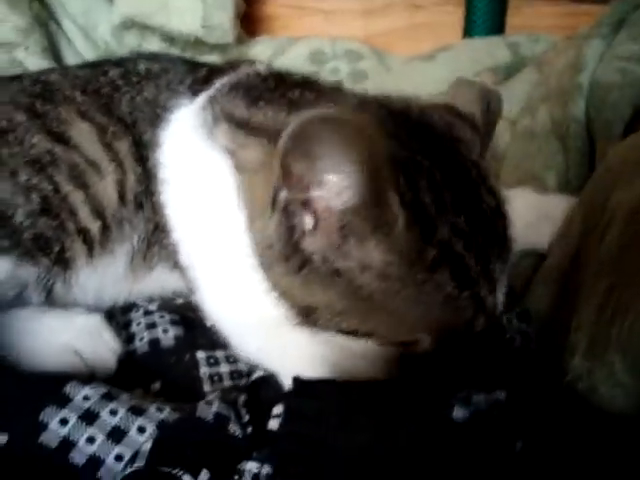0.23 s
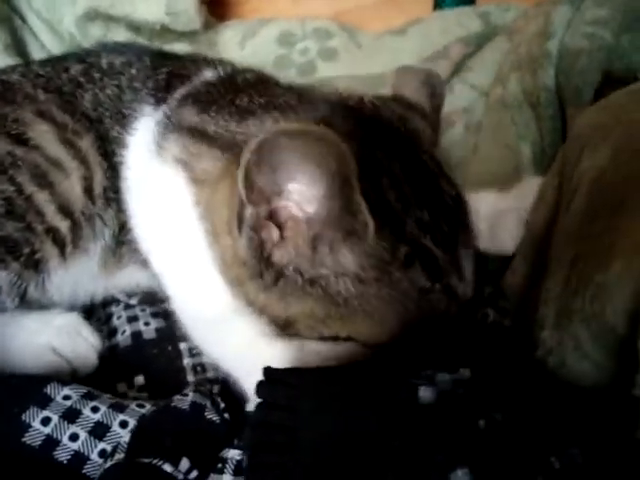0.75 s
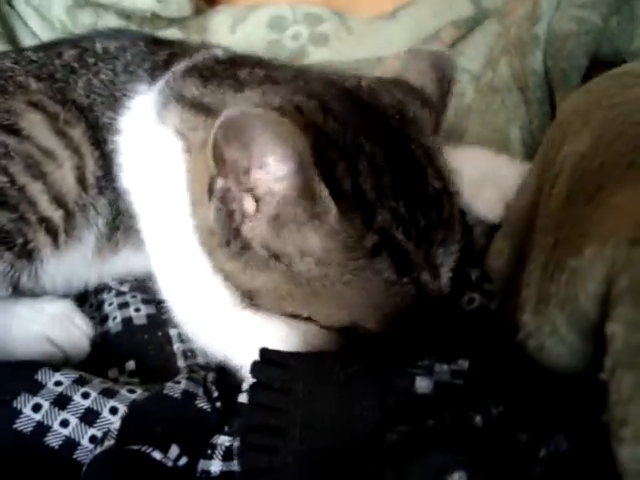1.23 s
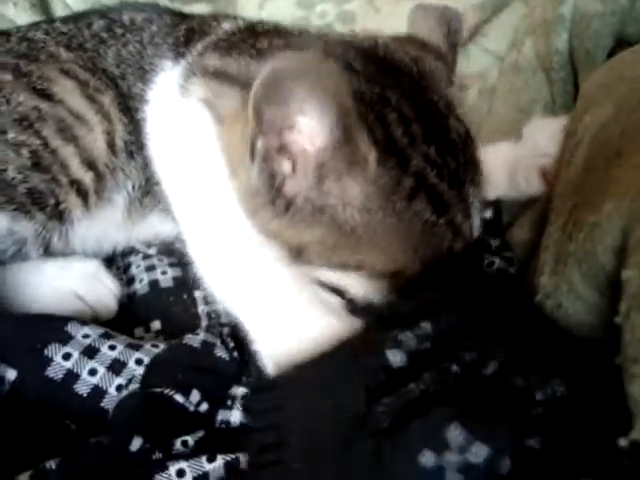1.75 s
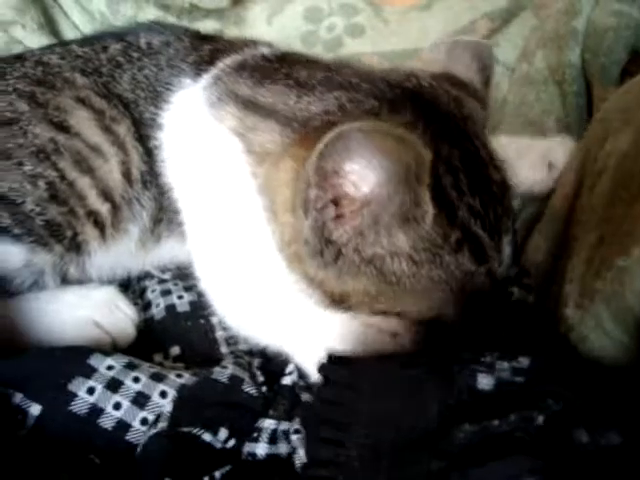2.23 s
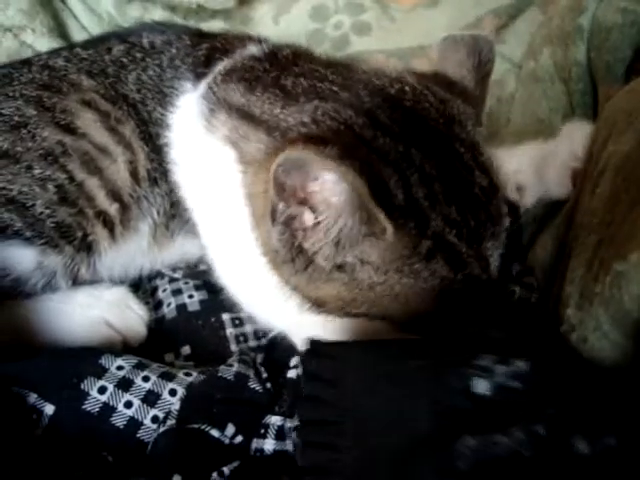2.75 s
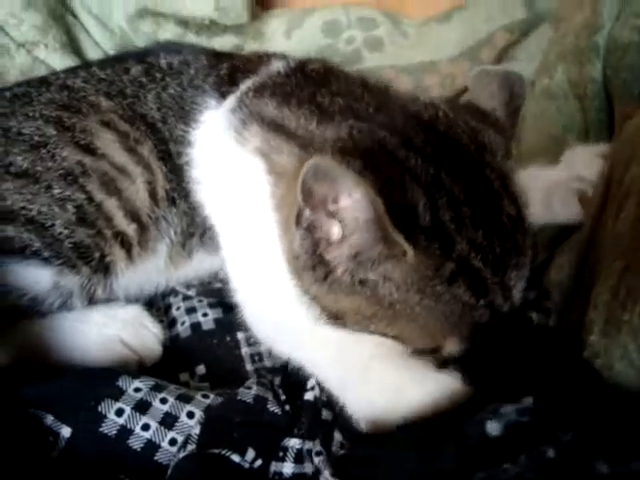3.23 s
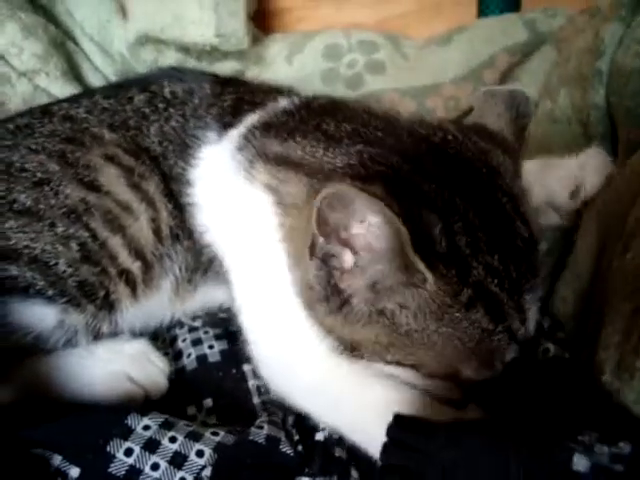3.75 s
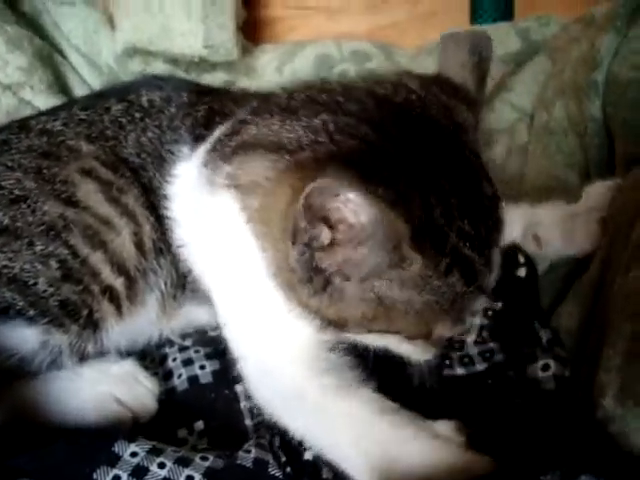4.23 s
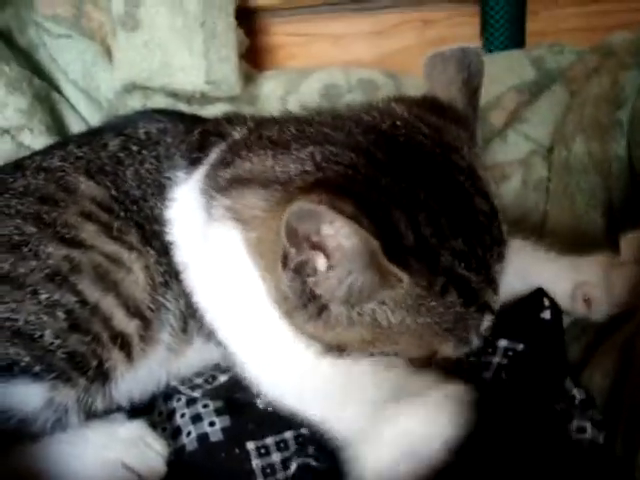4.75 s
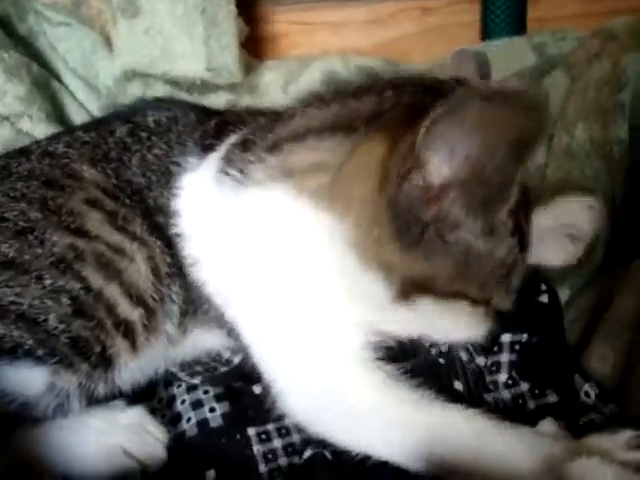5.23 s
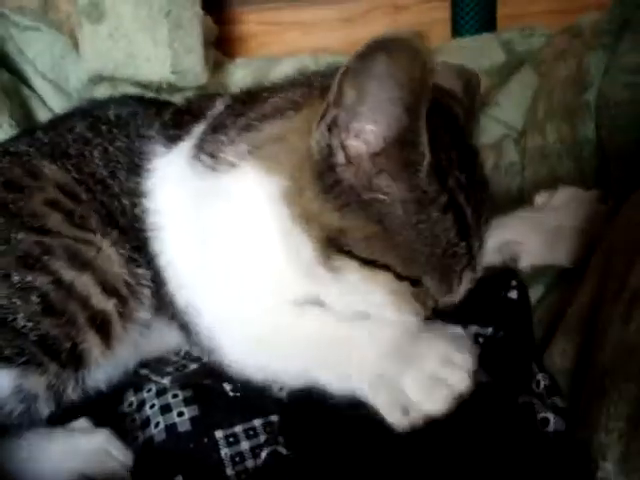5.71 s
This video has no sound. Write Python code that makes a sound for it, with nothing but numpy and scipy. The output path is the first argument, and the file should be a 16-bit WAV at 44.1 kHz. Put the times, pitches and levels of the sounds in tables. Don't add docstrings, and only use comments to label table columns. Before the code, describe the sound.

A kitten purrs without pause, very close to a small microphone in a quiet, soft-furnished room. The purr is a fast flutter of about twenty-nine pulses per second, each a small thump followed by a lighter shutting tick. In-breaths are quiet and sag gradually; out-breaths turn into loud, nasal snaps with fluttering air, at about 0.5-0.7 s, 1.75-2.0 s, 4.4-4.5 s, 5.0-5.15 s and 5.85 s to the end, with a weaker, chestier puff near 3.0 s. Small round coos sound near 1.7, 2.04 and 3.1-3.2 s, and a higher, louder one at 5.9 s. Tiny wet lip smacks are scattered throughout, densest from 1.9 to 3.5 s. Crisp claw snags click on threads, the sharpest near 2.14 s, with a cluster around 4.8 s. Steady hiss and faint low hum lie underneath; a thin distant whine joins after 4.2 s. The treble is band-limited.

```python
import sys
import numpy as np
from scipy import signal
from scipy.io import wavfile
from scipy.ndimage import uniform_filter1d

SR = 44100
rng = np.random.default_rng(int(sys.argv[2]) if len(sys.argv) > 2 else 0)


def master(y):
    cut = np.clip(np.atleast_2d(y).T, -1, 1)
    pcm = np.round(cut * 32767)
    wavfile.write(sys.argv[1], SR, pcm.astype(np.int16))


def voltage_ratio(level):
    return 10 ** (np.asarray(level, float) / 20)


N = 263706


def evened(x):
    return x / np.sqrt(np.mean(x ** 2) + 1e-20)


def envelope(t, rise_ms, fall_ms):
    return np.exp(-(np.minimum(t, 0) * 1000 / rise_ms) ** 2 - np.maximum(t, 0) * 1000 / fall_ms)


def ring(t, hz, rise_ms, fall_ms):
    return -envelope(t, rise_ms, fall_ms) * np.cos(2 * np.pi * hz * t)


def resonate(x, hz, width):
    return signal.lfilter(*signal.iirpeak(hz, hz / width, SR), x)


def resonate_twice(x, hz, width, second_width):
    return resonate(resonate(x, hz, width), hz, second_width)


def lay(starts_s, sounds):
    at = np.round(starts_s * SR).astype(int)[:, None] + np.arange(sounds.shape[1])
    inside = (at >= 0) & (at < N)
    return np.bincount(at[inside], sounds[inside], N)


def loudest_ramp(t, start, end, first, last, rise, fall):
    glide = first + (last - first) * np.clip((t - start) / (end - start), 0, 1)
    ramps = glide - rise * np.maximum(start - t, 0) - fall * np.maximum(t - end, 0)
    return ramps.max(axis=1, keepdims=True)


def hum(lines):
    total = np.zeros(N)
    for hz, width, db in lines:
        band = resonate_twice(rng.standard_normal(N), hz, width, width)
        total += voltage_ratio(db) * evened(band)
    return total


# f/Hz, level per Hz/dB
ROOM_SPECTRUM = [(15, -59), (25, -24.5), (124, -9), (190, -5.5), (425, -5), (795, -5), (1070, -8),
                 (1250, -4.5), (1380, -6), (1730, -8.5), (1860, -10), (4960, -18), (10000, -21.5),
                 (13000, -44), (22000, -120)]
ROOM_DB = -48.5
# f/Hz, width/Hz, level/dB
MACHINE_HUMS = [
    (57.8, 5.4, -72),
    (119.1, 7.4, -70),
    (233.1, 8.2, -58.5),
    (1310, 7, -73.5),
]
# f/Hz, width/Hz, level/dB
FAR_WHINE = [
    (1120, 18, -63.5),
    (1453, 15, -65.5),
    (1736, 120, -60.5),
    (1980, 77, -70),
    (2150, 140, -62.5),
    (2237, 44, -61.5),
]
WHINE_FROM_S, WHINE_FULL_S = 4.2, 4.7


def room():
    frames, hz = N // 256 + 5, np.fft.rfftfreq(1024, 1 / SR)
    a, b, patches, gaps = rng.standard_normal((frames, 513, 4)).T
    patches = evened(uniform_filter1d(uniform_filter1d(patches, size=14, axis=0), size=10, axis=1))
    gaps = evened(uniform_filter1d(uniform_filter1d(gaps, size=24, axis=0), size=3, axis=1))
    gaps_db = -7.0 * np.clip(gaps - 1.6, 0, 1) * (hz > 3500)[:, None]
    f, db = np.transpose(ROOM_SPECTRUM)
    spectrum_db = np.interp(np.log(hz + 1), np.log(f), db)[:, None]
    z = (a + 1j * b) * voltage_ratio(spectrum_db + 1.24 * patches + gaps_db)
    hiss = voltage_ratio(ROOM_DB) * evened(signal.istft(z, nperseg=1024, noverlap=768)[1][:N])
    whine_fade = np.interp(np.arange(N) / SR, [WHINE_FROM_S, WHINE_FULL_S], [0, 1])
    return hiss + hum(MACHINE_HUMS) + whine_fade * hum(FAR_WHINE)


def bedding_echo(near):
    t = np.arange(3000) / SR
    echo = rng.standard_normal(len(t)) * voltage_ratio(-60 * t / 0.12) * (t > .002)
    return voltage_ratio(-17.0) * signal.oaconvolve(near, echo / np.linalg.norm(echo))[:N]


# t/s, peak level/dB, brightest f/Hz, length/ms
CLAW_SNAGS = [(0.1453, -35, 7860, 1.2), (0.1524, -36, 7400, 1.4), (0.448, -33.5, 7640, 1.1),
              (0.94, -34, 7820, 1.1), (0.9455, -36, 5240, 1.4), (1.5289, -41, 4950, 1.1),
              (1.6192, -39, 5060, 1.4), (1.65, -37, 4530, 1.8), (1.671, -40, 4760, 1.6),
              (1.6974, -42, 4750, 1.4), (1.9024, -32.5, 6720, 1.9), (2.1324, -32, 7460, 1.6),
              (2.1372, -24.5, 3700, 2), (2.14, -39, 4580, 1.4), (2.6569, -35, 5700, 1.9),
              (2.984, -37, 5500, 1.44), (3.228, -31, 5400, 1.1), (4.2877, -39, 4980, 1.4),
              (4.787, -38, 4000, 2), (4.823, -39, 4100, 2), (4.8274, -32, 4800, 1.3),
              (4.842, -34, 4690, 1.4), (4.8524, -42, 5540, 1.4), (5.1537, -40, 4560, 1.4)]


def snags():
    s, db, hz, ms = np.transpose(CLAW_SNAGS)[:, :, None]
    t = np.arange(700) / SR - .002
    grit = rng.standard_normal((len(s), len(t))) * voltage_ratio(7.5 * rng.standard_normal((len(s), len(t))))
    grit = signal.sosfilt(signal.butter(1, 1800, "high", fs=SR, output="sos"), grit)
    bright = np.array([row + 1.6 * resonate(row, f, 2600) for row, f in zip(grit, hz[:, 0])])
    burst = bright * envelope(t, 0.71 * ms, ms)
    return lay(s[:, 0] + t[0] + 0.00062, voltage_ratio(db + 3.0) * burst / abs(burst).max(axis=1, keepdims=True))


# t/s, peak level/dB, f/Hz
LIP_SMACKS = [(0.0326, -43, 2440), (0.388, -42, 1880), (0.5435, -42.5, 2900), (1.5289, -42, 3060),
              (1.9459, -35, 2440), (2.1796, -45, 2110), (2.1999, -42.5, 2700), (2.236, -42, 1950),
              (2.3667, -41, 2150), (2.436, -37.5, 1880), (2.488, -38, 2130), (2.687, -38.5, 2000),
              (2.704, -41.5, 2720), (2.9852, -41.5, 2060), (3.0195, -42, 2500), (3.051, -47, 2060),
              (3.2809, -37.5, 2160), (3.474, -41, 2410), (3.4762, -40, 2710), (3.4945, -46, 2010),
              (3.755, -44, 2860), (3.8935, -49, 1800), (3.9846, -56, 1830), (4.1858, -44, 3240),
              (4.788, -47, 2248), (4.841, -49, 2260), (4.852, -39.5, 2240), (5.0506, -43, 2150),
              (5.8125, -44, 2200), (5.95, -39, 1810)]


def smacks():
    s, db, hz = np.transpose(LIP_SMACKS)[:, :, None]
    t = np.arange(400) / SR - .001
    return lay(s[:, 0], voltage_ratio(db + 12.0) * ring(t, hz, 0.11, 0.31))


# t/s, peak level/dB, f/Hz, length/ms
NOSE_COOS = [
    (1.712, -33, 564, 5.6),
    (1.744, -47, 555, 2.4),
    (2.04, -28.5, 537, 1.8),
    (3.097, -31, 620, 7.3),
    (3.164, -28.5, 516, 4.9),
    (3.197, -28.5, 540, 3.6),
    (5.884, -44, 814, 2.2),
    (5.917, -26, 780, 7.4),
]


def coos():
    s, db, hz, ms = np.transpose(NOSE_COOS)[:, :, None]
    t = np.arange(2000) / SR - .015
    return lay(s[:, 0] + t[0], voltage_ratio(db) * ring(t, hz, ms, 0.35 * ms))


# from t/s, to t/s, first level/dB, last level/dB, shutting over thump/dB
IN_BREATHS = [
    (0, 0.338, -36, -43, 0),
    (0.82, 1.3, -37.5, -44, 3),
    (1.507, 1.642, -40.5, -45, 6),
    (2.192, 2.723, -40, -41.5, 2),
    (3.383, 4.23, -40, -44, 2.5),
    (4.628, 4.883, -36.5, -43.5, -1),
    (5.3, 5.75, -39, -41.5, -1.5),
]
IN_RISE, IN_FALL, PAUSE_DB = 62, 180, -45.5
# from t/s, to t/s, first level/dB, last level/dB, thump over nose snap/dB
OUT_BREATHS = [
    (0.486, 0.685, -37, -34, -23),
    (1.71, 1.983, -39, -36.5, -16),
    (2.96, 3.07, -33, -41, -2),
    (4.387, 4.492, -41.5, -33.5, -11.5),
    (4.975, 5.143, -39.5, -37.5, -6.5),
    (5.81, 5.98, -40, -36.5, -15),
]
AIR_RISE, AIR_FALL, AIR_REST_DB = 320, 400, -61.5
CHEST_FOLLOWS = 1.8
# from t/s, to t/s, first level/dB, last level/dB
HARD_SHUTS = [
    (.44, 0.689, -30.5, -33),
    (1.738, 2.001, -28, -33.5),
    (2.89, 3.031, -33.5, -32),
    (3.03, 3.17, -34.5, -39.5),
    (4.322, 4.499, -32, -30.5),
    (4.944, 5.162, -30, -31),
    (5.77, 5.905, -34.5, -29),
]
SHUT_RISE, SHUT_FALL = 190, 390
OPEN_IN_MS, OPEN_FIRST_MS, OPEN_LAST_MS = 12.6, 11.7, 9.7
# from t/s, to t/s, first level/dB, last level/dB, fall/dB per s
NOSE_SNAPS = [
    (.48, .513, -27, -25, 60),
    (.578, .675, -29, -17, 280),
    (1.767, 1.866, -30, -18, 360),
    (1.866, 1.932, -17.5, -18.6, 260),
    (2.988, 3.023, -28, -28.5, 350),
    (4.394, 4.495, -27, -22, 700),
    (5.008, 5.143, -24.3, -26.2, 700),
    (5.875, 5.94, -38, -24, 700),
    (5.94, 5.974, -24, -20, 700),
]
SNAP_RISE, SNAP_REST_DB = 300, -46.5


def breath(t):
    start, end, first, last, fall = np.transpose(NOSE_SNAPS)
    nose_db = np.maximum(loudest_ramp(t, start, end, first, last, SNAP_RISE, fall), SNAP_REST_DB)

    start, end, first, last, over_db = np.transpose(IN_BREATHS)
    chest_db = np.maximum(loudest_ramp(t, start, end, first, last, IN_RISE, IN_FALL), PAUSE_DB)
    soft_shut_db = loudest_ramp(t, start, end, first + over_db, last + over_db, IN_RISE, IN_FALL)

    start, end, first, last = np.transpose(HARD_SHUTS)
    shut_db = np.maximum(soft_shut_db, loudest_ramp(t, start, end, first, last, SHUT_RISE, SHUT_FALL))
    first_ms, last_ms = OPEN_IN_MS - OPEN_FIRST_MS, OPEN_IN_MS - OPEN_LAST_MS
    shorter_ms = loudest_ramp(t, start, end, first_ms, last_ms, 16.6, 48)
    open_ms = OPEN_IN_MS - np.maximum(shorter_ms, 0)

    start, end, first, last, over_db = np.transpose(OUT_BREATHS)
    air_db = np.maximum(loudest_ramp(t, start, end, first, last, AIR_RISE, AIR_FALL), AIR_REST_DB)
    over_db = loudest_ramp(t, start, end, over_db, over_db, AIR_RISE, AIR_FALL)
    chest_db = np.maximum(chest_db, over_db - 22 + CHEST_FOLLOWS * (nose_db + 22))
    return chest_db, nose_db, shut_db, air_db, open_ms


def airflow(t, since_shut):
    gust = np.clip(t / 0.0012 + 0.27, 0, 1) * envelope(since_shut, 42.0, 3.8)
    noise = rng.standard_normal(since_shut.shape)
    nasal = resonate_twice(noise, 460, 240, 280) + 0.97 * resonate_twice(noise, 810, 150, 190)
    chest = 0.55 * resonate_twice(noise, 340, 240, 280)
    high = 0.063 * resonate_twice(noise, 1650, 860, 700)
    air = gust * (nasal + chest + high)
    return air * np.sqrt((gust ** 2).sum(axis=1) / (air ** 2).sum(axis=1))[:, None]


# t/s, twitches so far
LARYNX_CLOCK = [(0.0042, 0), (0.3129, 9), (0.4802, 14), (0.6749, 20), (0.7744, 23), (1.601, 47),
                (1.9648, 58), (2.2008, 65), (2.7907, 82), (2.8917, 85), (3.2184, 95), (4.2281, 124),
                (4.4938, 132), (4.9758, 146), (5.1075, 150), (5.7052, 167), (5.8416, 171), (5.9732, 175)]


def purr():
    s, count = np.transpose(LARYNX_CLOCK)
    twitch = np.interp(np.arange(count[-1] + 1), count, s)
    chest_db, nose_db, shut_db, air_db, open_ms = breath(twitch[:, None])
    luck = rng.standard_normal((len(twitch), 8)).T[:, :, None]
    lead = .005
    t = np.arange(2000) / SR - lead

    wide = np.clip((nose_db + 43.0) / 18, 0, 1)
    chest_hz = (265 + 45 * wide) * (1 + .03 * luck[1])
    chest = ring(t, chest_hz, .7, 5.5 + 3 * wide)
    nose_hz = (600 + 120 * wide) * (1 + .03 * luck[2])
    nose = ring(t, nose_hz, 1.1, 1.4) + .07 * ring(t, 1650, .9, .9)

    since_shut = t - (open_ms + .6 * luck[3]) / 1000
    shut_hz = 740 * (1 + .06 * luck[4])
    shut = ring(since_shut, shut_hz, 0.91, 0.84 + .5 * wide) + 0.26 * ring(since_shut, 1700, 1.0, 0.64)
    shut = shut + .35 * ring(since_shut, 300, .8, 4.5)
    outward = (np.gradient(twitch)[:, None] < .0338) & (nose_db < -34)
    shut = np.where(outward, -shut, shut)

    air = airflow(t, since_shut)
    thump = voltage_ratio(chest_db + 1.5 * luck[0] + 4.5) * chest
    snaps = voltage_ratio(nose_db - 0.5) * nose + voltage_ratio(shut_db + 1.3 * luck[6] + 2.5) * shut
    cycle = thump + snaps + voltage_ratio(air_db + 1.2 * luck[7] + 1.0) * air
    no_bass = signal.butter(2, 170, "high", fs=SR, output="sos")
    return signal.sosfiltfilt(no_bass, lay(twitch - lead, cycle))


def scene():
    near = purr() + coos() + smacks() + snags()
    return (near + bedding_echo(near) + room())[None]


def top_cut(x):
    return signal.sosfilt(signal.butter(12, 10830, fs=SR, output="sos"), x)


# click t/s, low f/Hz, high f/Hz, level before/dB, level after/dB
TREBLE_DROPOUTS = [(.004, 6000, 6800, 0, -9), (.149, 7200, 10500, -7, 0), (.447, 5300, 8400, 0, -14),
                   (.946, 6800, 10500, -7, -5), (1.527, 3600, 7500, 0, -6), (1.903, 5300, 9000, -4, -4),
                   (2.134, 6700, 10500, -11, 0), (2.138, 4300, 10500, 0, -14), (3.229, 5000, 10500, -4, -6),
                   (4.29, 4500, 6000, -6, 0), (4.83, 8700, 10500, -8, 0)]
SPARED_S, STARVED_S = .006, .032
EDGE_HZ = 10005


def record(dry):
    hz, t, z = signal.stft(dry, SR, nperseg=128)
    for click, low_hz, high_hz, before_db, after_db in TREBLE_DROPOUTS:
        away = abs(t - click)
        in_time = np.clip(np.minimum(away - SPARED_S, STARVED_S - away) / .002 + .5, 0, 1)
        in_band = np.clip(np.minimum(hz - low_hz, high_hz - hz) / 300 + .5, 0, 1)[:, None]
        z = z * voltage_ratio(np.where(t < click, before_db, after_db) * in_time * in_band)
    thinned = signal.istft(z, SR, nperseg=128)[1][:, :N]
    edge = signal.firwin(numtaps=255, cutoff=EDGE_HZ, window=("kaiser", 8), fs=SR)
    limited = signal.oaconvolve(thinned, edge[None], "same")
    return top_cut(limited)


dry = scene()
out = record(dry)
master(out)
```